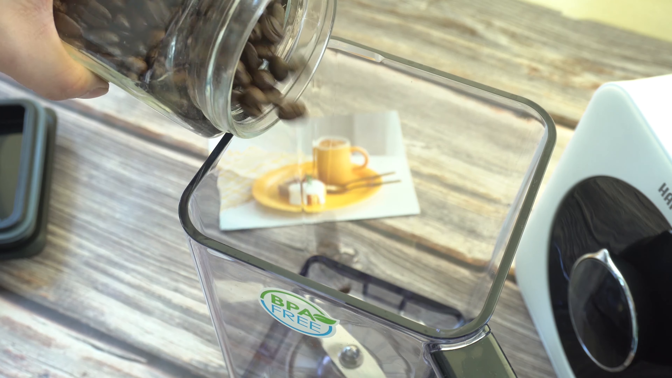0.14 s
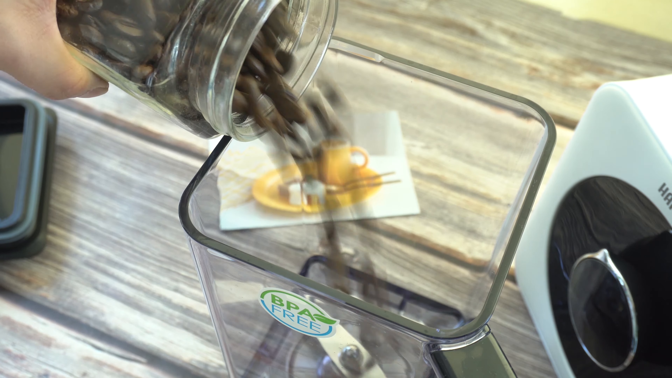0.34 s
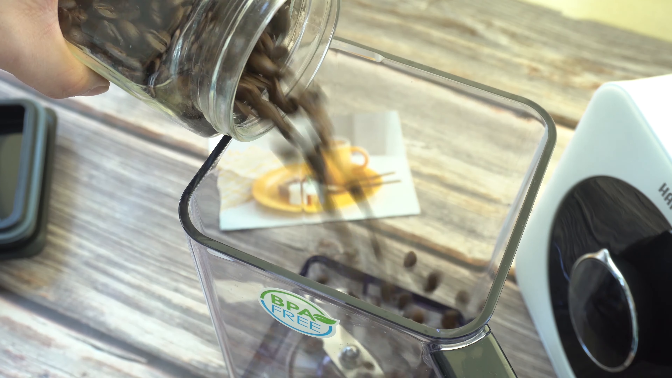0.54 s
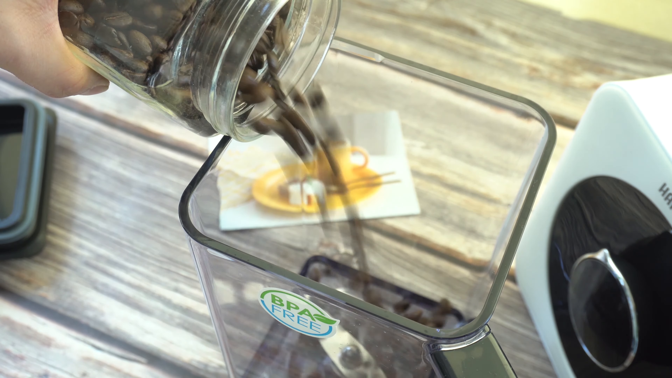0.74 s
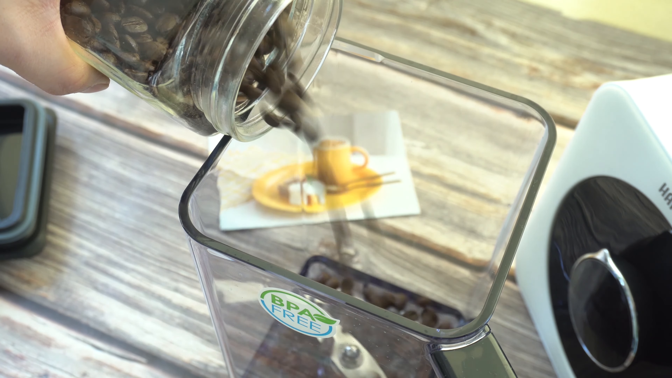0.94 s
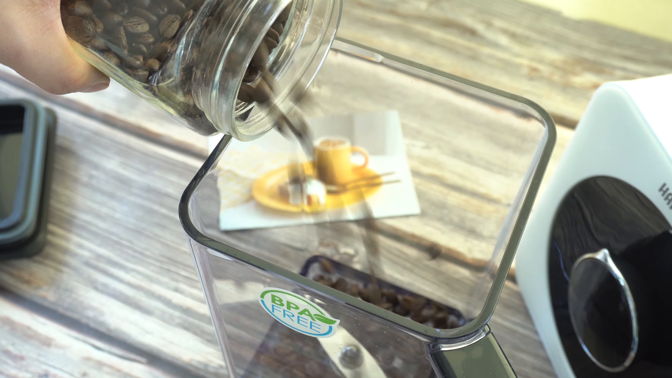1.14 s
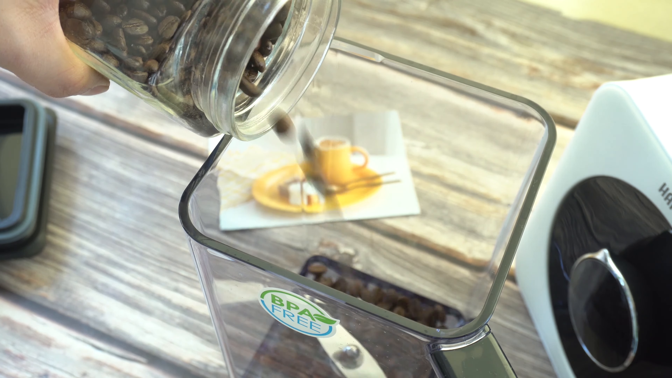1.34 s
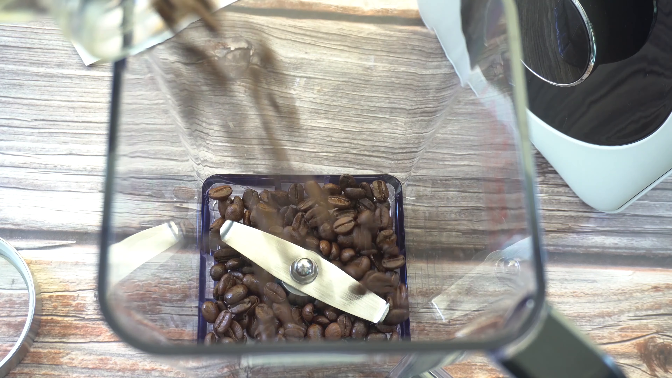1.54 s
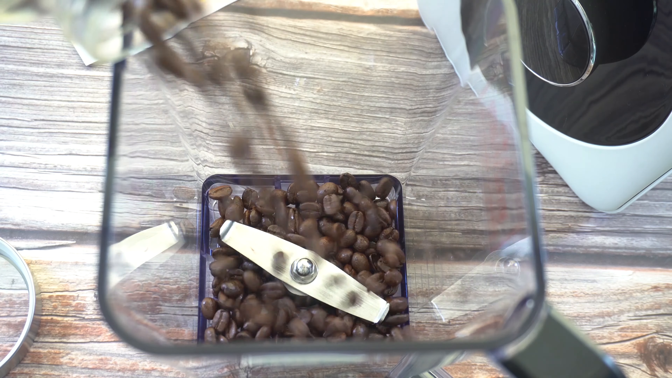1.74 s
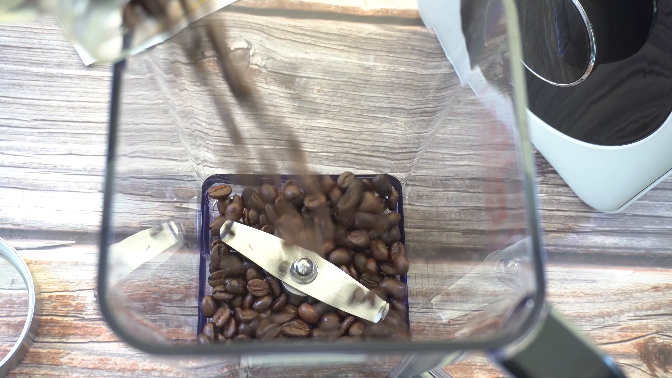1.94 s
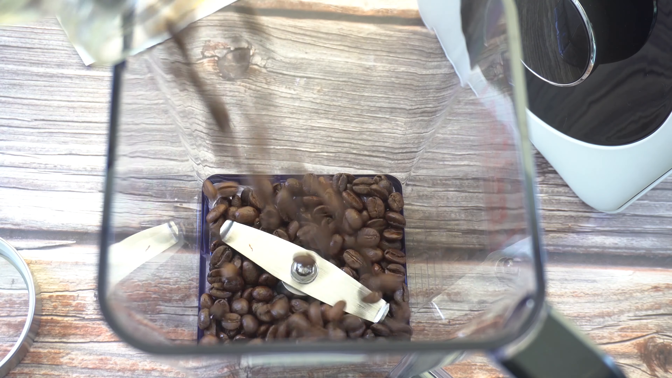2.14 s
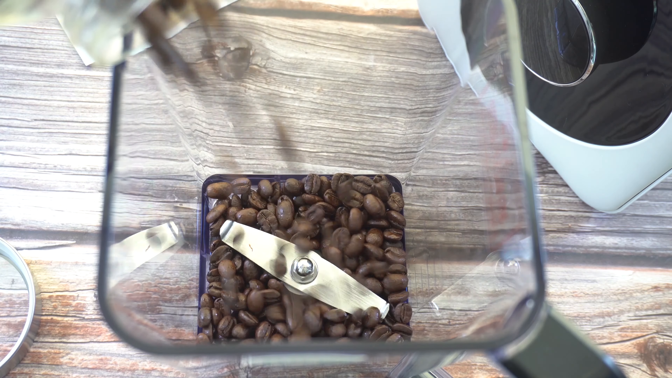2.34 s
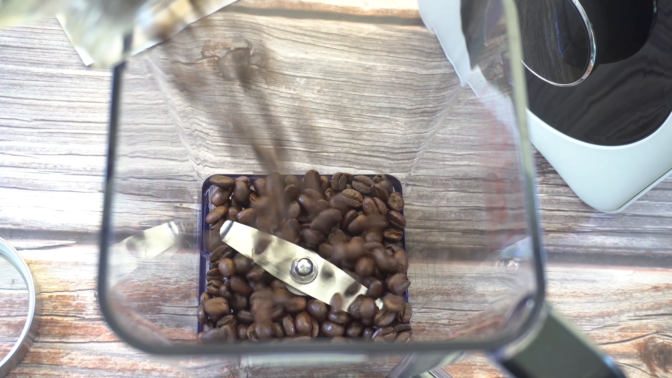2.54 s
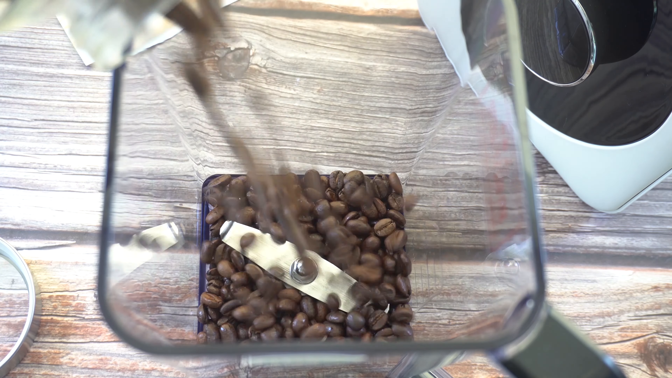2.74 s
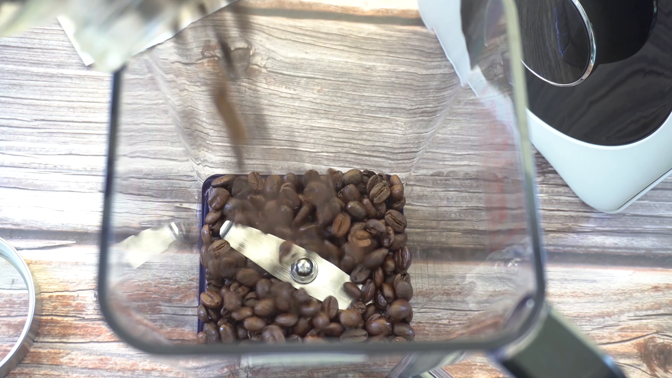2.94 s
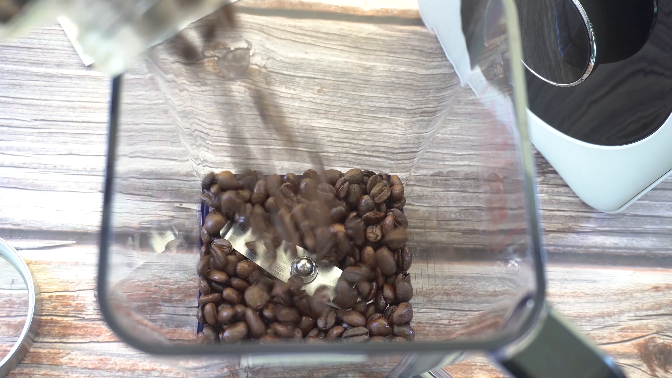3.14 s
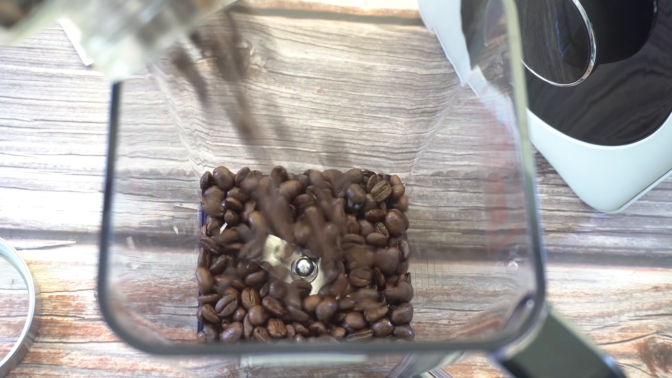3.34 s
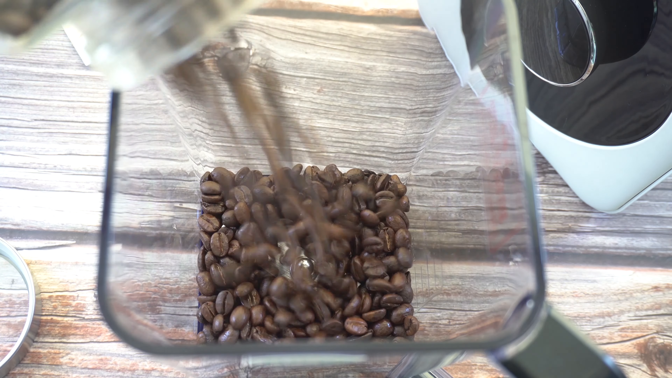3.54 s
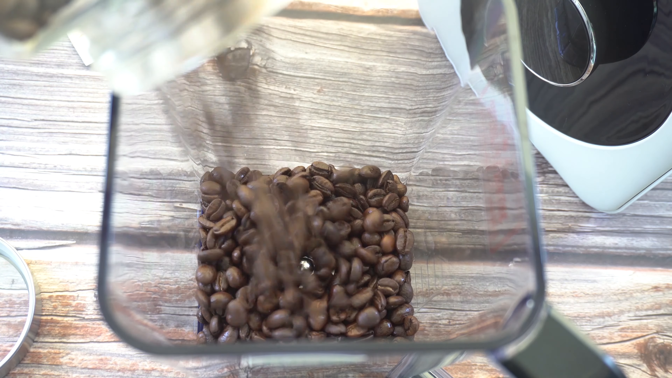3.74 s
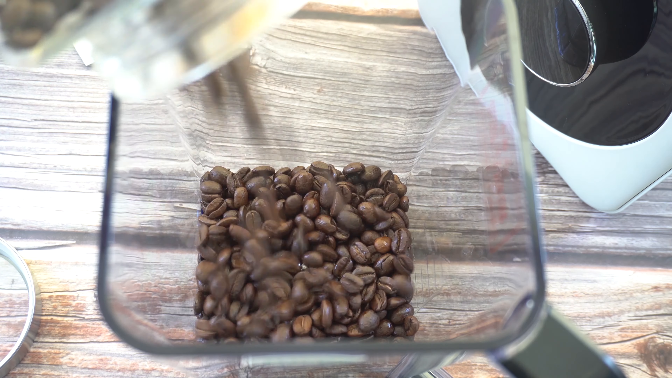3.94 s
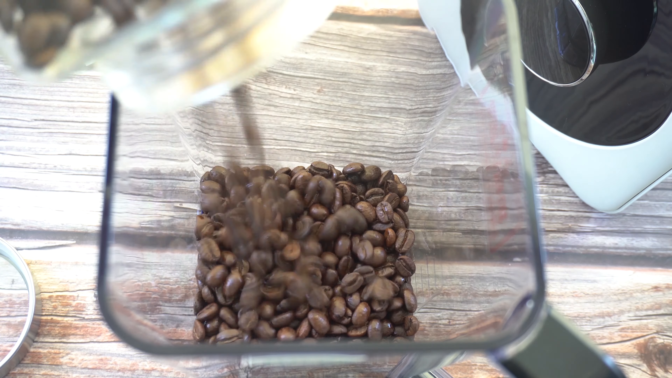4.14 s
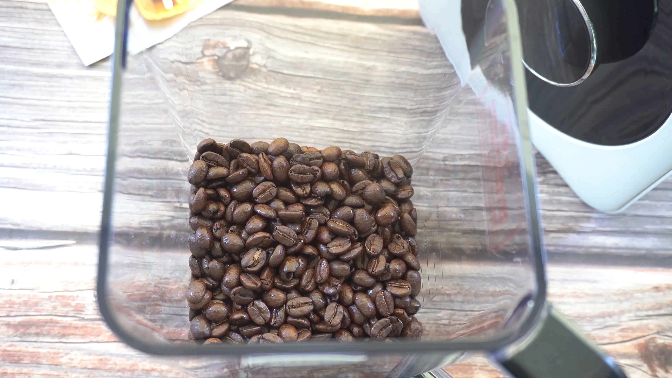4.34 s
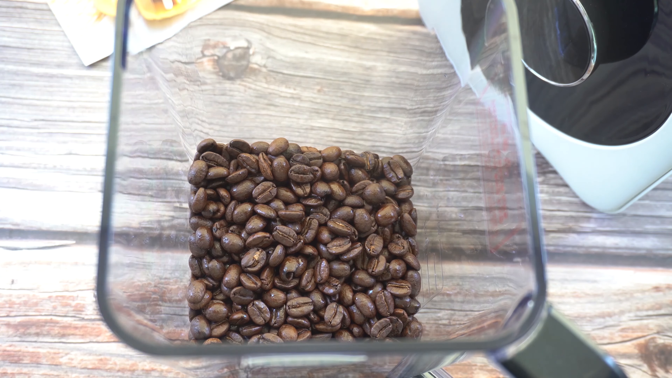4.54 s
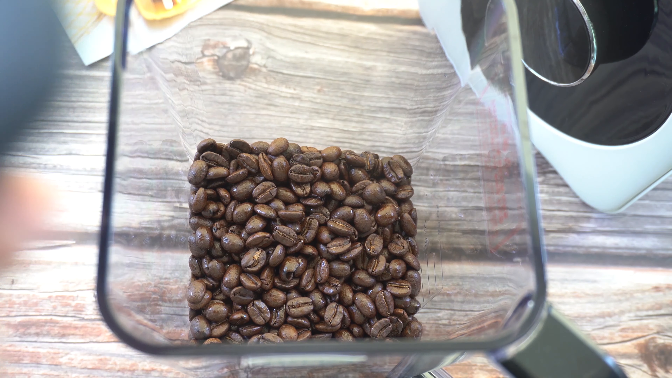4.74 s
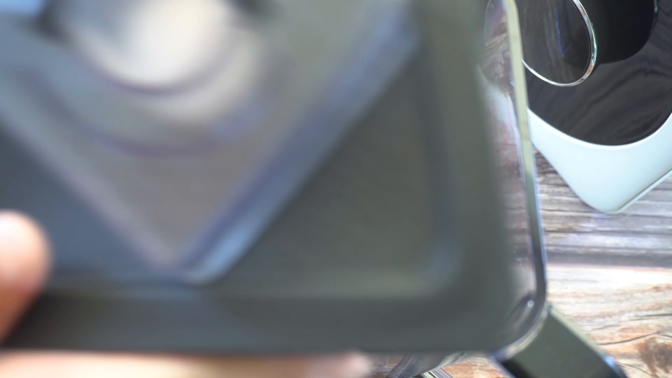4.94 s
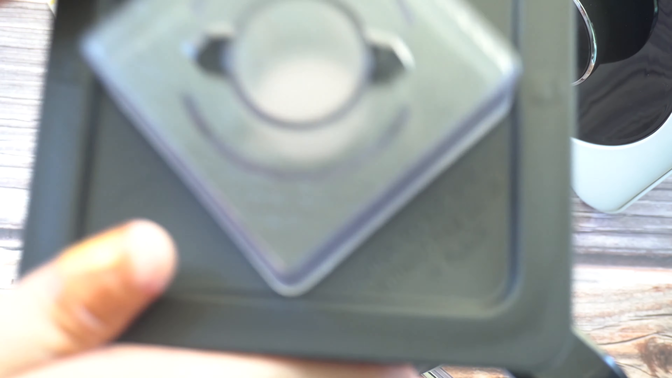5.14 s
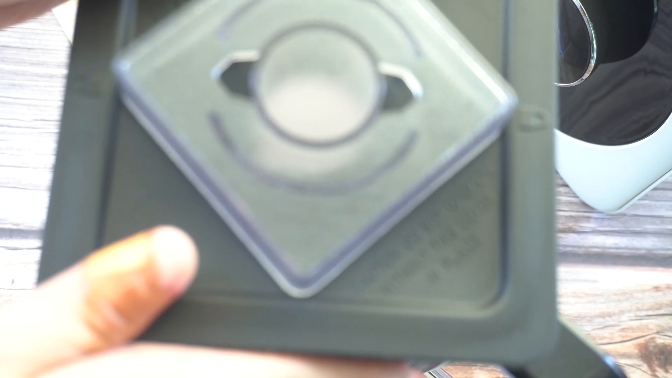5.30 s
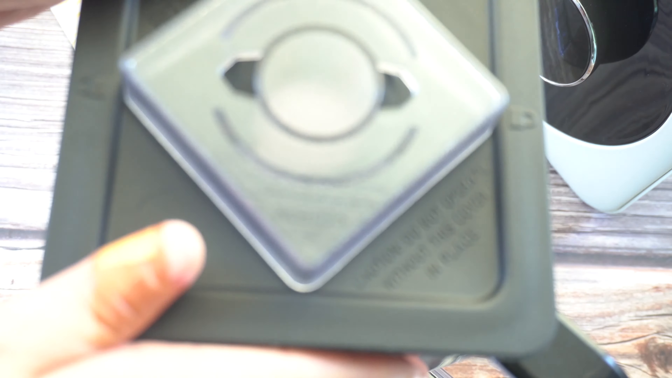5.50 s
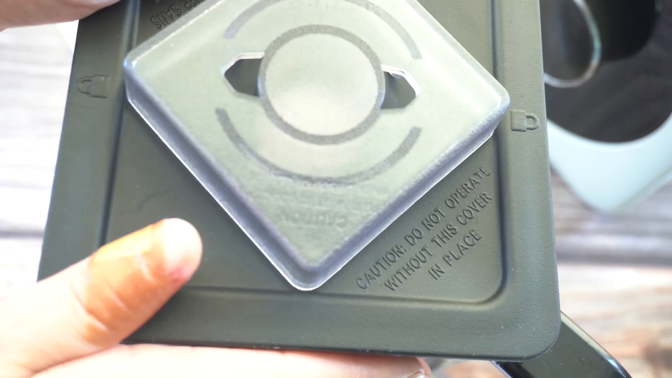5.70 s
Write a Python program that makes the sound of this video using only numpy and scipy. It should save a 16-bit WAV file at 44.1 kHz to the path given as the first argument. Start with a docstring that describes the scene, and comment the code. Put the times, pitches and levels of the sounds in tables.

```python
"""Coffee beans pour from a glass jar into a plastic blender jar, in a quiet room with steady air noise. From
the start beans tick on each other (short chirps and clicks) and drum on the walls (impulses through
resonances); they ring the steel blade (damped sines), fainter as the bed covers it. All pour sounds stop
abruptly at 4.4 s. A hand then lifts and turns the lid: faint knocks (damped modes and noise), a low hum and
rubs (grainy noise)."""
import sys
import numpy as np
from scipy import signal
from scipy.fft import rfft, irfft, next_fast_len
from scipy.io import wavfile
from scipy.ndimage import map_coordinates

SR = 44100
rng = np.random.default_rng(int(sys.argv[2]) if len(sys.argv) > 2 else 0)


def transcribe(u):
    """Save the signal u as a 16-bit wav file named by the first command-line argument.

    u: samples, shape (n,) or (channels, n), limited to [-1, 1]; the rate is SR.
    q: integer samples, one column per channel.
    """
    v = np.clip(np.atleast_2d(u).T, -1, 1)
    q = np.round(v * 32767).astype(np.int16)
    wavfile.write(sys.argv[1], SR, q)


N = 254467

# Room air spectrum. Each row: frequency in Hz, relative level in dB.
AIR_SPECTRUM = [(24, -92.5), (40, -38.5), (201, -28.5), (271, -20), (358, -18), (673, -16), (763, -8.5),
                (981, -14.5), (1110, -23.5), (1290, -20), (3730, -28.5), (4450, -28.5), (4800, -29),
                (14200, -35.5), (16500, -54.5)]
# Likeness of left and right in the room air. Each row: frequency in Hz, correlation.
AIR_LIKENESS = [(60, 0.9), (240, 0.7), (950, 0.39), (15000, 0.2)]
# Low hum of the handled lid. Each row: peak time in seconds, rms level at the peak in dB, rise and fall in seconds.
LID_HUMS = [(5.06, -68.5, 0.027, .03), (5.42, -42.5, 0.025, 0.023), (5.5, -57, 0.017, 0.0093),
            (5.535, -44, 0.0058, 0.0058), (5.565, -52, 0.0086, 0.01), (5.605, -55, 0.009, 0.01),
            (5.642, -64.5, 0.009, .012)]
# Finger strokes on the lid. Each row: peak time in seconds, level in dB, rise and fall in seconds.
RUBS = [(4.49, -38.5, 0.014, 0.0067), (4.6, -49, 0.042, 0.027), (4.81, -43, 0.018, 0.034),
        (5.09, -49.5, 0.045, 0.046), (5.385, -59, .008, 0.0091), (5.47, -54, .008, .008)]
# Spectrum of skin on the lid. Each row: frequency in Hz, relative level in dB.
SKIN_SPECTRUM = [(180, -46), (300, -33), (447, -20), (1100, -9), (1210, -9.5), (2650, -6), (3580, -13.5),
                 (9390, -17), (16000, -27)]
# Hollow knocks of jar and lid. Each row: start in seconds, relative level in dB, level of the bright part
# against it in dB, favoured bright pitch in Hz, share of the hollow modes' free ring time.
KNOCKS = [(0.128, -16.5, -2, 1070, 0.56), (0.346, -21.5, -7, 1060, 0.62), (4.476, -38, 9.5, 2800, 0.25),
          (4.485, -33, 13, 1260, 0.43), (4.809, -71, 10, 1490, .4), (5.089, -32, -4, 1790, 0.35),
          (5.104, -26.5, -10, 1300, 0.37), (5.356, -23.5, -12.5, 900, 0.59),
          (5.377, -30.5, -3.5, 1350, 0.48), (5.463, -47, 5.5, 1650, .5), (5.524, -14.5, -17, 920, 0.56),
          (5.548, -32, -24, 695, 1)]
# Low modes of a knock. Each row: frequency in Hz, level in dB, free t60 in seconds.
HOLLOW_MODES = [(258, -5, .08), (301, -2, .08), (345, -3, .07), (424, 2, .07), (432, -11, .4),
                (490, -4, .07), (570, -13, .06)]
# Bright modes of a knock. Each row: frequency in Hz, level in dB, t60 in seconds.
BRIGHT_MODES = [(816, 3.5, 0.1), (1070, 11.5, 0.027), (1700, 9.5, 0.041), (2100, 9, 0.04),
                (2410, 14, 0.021)]
# Lone clear pings. Each row: start in seconds, relative level in dB, frequency in Hz.
PINGS = [(1.54, -20, 7040), (1.566, -30, 7000), (4.432, -47, 2360), (4.433, -62, 2880), (4.595, -56, 2600)]
# Beans that stand out on the blade. Each row: start in seconds, relative level in dB, landing place 0-3 along it.
BLADE_STRIKES = [(.2464, -18, 0), (.248, -28, 3), (.335, -16, 0), (.336, -24, 3), (.445, -12, 0),
                 (.446, -24, 3), (.555, -14, .2), (.621, -13, .1), (.681, -13, .1), (.741, -15, .1),
                 (.843, -13, .2), (.881, -19, 3), (.895, -15, 1), (.931, -14, .1), (.989, -18, 3),
                 (1.02, -19, .7), (1.115, -18, .3), (1.074, -19, 3), (1.156, -17, 3), (1.265, -18, 3),
                 (1.3234, -12, 0), (1.35, -10, 0), (1.39, -13, .7), (1.398, -16, 3), (1.427, -12, 0),
                 (1.645, -18, 3), (1.646, -13.5, 0), (1.7175, -12, .55), (1.718, -17, 3), (1.7465, -16, .3),
                 (1.778, -19, 2), (1.795, -17, .2), (1.82, -14, .8), (1.85, -17, .5), (1.885, -21, 2),
                 (1.945, -18, .4), (1.9035, -15, 3), (1.909, -14, 1), (1.976, -6, .8), (2.045, -15, .6),
                 (2.064, -17, 3), (2.077, -12, .35), (2.155, -9, .6), (2.192, -12, .55), (2.217, -12.5, 0),
                 (2.263, -14, 0), (2.298, -16, .1), (2.348, -13, 0), (2.429, -19, 0), (2.465, -16, 3),
                 (2.467, -15, .1), (2.601, -26, 2), (2.63, -11, .4), (2.632, -23, 2), (2.677, -23, 2),
                 (2.643, -16, 3), (2.676, -18, .2), (2.755, -17, 3), (2.762, -18, 1.9), (2.8, -21, 2),
                 (2.929, -23, 2), (2.979, -24, 2), (2.783, -17, .1), (2.98, -19, .1), (3.0135, -18, 3),
                 (3.028, -19, 1.2), (3.056, -22, 0), (3.057, -22, 2), (3.103, -22, 0), (3.187, -21, 2),
                 (3.2101, -22, 0), (3.245, -24, 0), (3.315, -26, 0), (3.337, -21, 2), (3.058, -17, 3),
                 (3.123, -19, 3), (3.144, -15, 3), (3.152, -14, 3), (3.78, -29, 2), (3.21, -17, 2),
                 (3.235, -18, 3), (3.237, -18, 2), (3.313, -15, 3), (3.557, -28, 2), (3.631, -28, 2)]
# Blade modes. Each row: frequency in Hz, level in dB, t60 in seconds before stifling.
BLADE_MODES = [(5495, 0.5, .12), (5550, -9, .1), (5157, -2.5, 0.2), (4762, -1, 0.09), (13000, -5.5, .08),
               (12838, -5.5, 0.08)]
# Ring that each blade mode belongs to: 0 main, 1 middle, 2 low, 3 high.
MODE_RING = [0, 0, 1, 2, 3, 3]
# Small hits on the blade, a row per ring. Each row: level at time 0 in dB, drift in dB per second,
# time in seconds when the bed covers it.
SMALL_HITS = [(-24, -3, 2.8), (-36, 2, 2.4), (-44, 4, 3.4), (-34, 0.5, 3.35)]
# Span in which the stream passes beside the blade: start and end in seconds.
MISS_SPAN_S = (1.45, 1.63)
# Resonances of walls and air column. Each row: frequency in Hz, width in Hz, level in dB in the first balance,
# level in dB in the second balance.
JAR_MODES = [(336, 14, -2, -2.5), (444, 31, -4, -9.5), (517, 5.5, -21, -6), (640.3, 8.9, -6, -5),
             (799, 12, -4, -15), (935, 59, -5.5, -6.5), (1220, 66, -10, -15.5), (1300, 79, -6, -4),
             (1423, 143, -9.5, -5), (1626, 45, 0, -0.5), (1900, 79, -2, -1.5), (2024, 69, 1, 2.5),
             (2660, 225, -1, -4), (3140, 46, 2, 1), (4840, 2180, -4, -6.5)]
# Beans that hit the wall hard. Each row: start in seconds, relative level in dB, level of the dull low part
# against it in dB.
THUMPS = [(.398, -22.5, -14), (0.542, -24.5, -14), (.613, -21, 4), (0.652, -22, -3), (.796, -25.5, -12),
          (.851, -19.5, 8.5), (0.954, -23, 0), (1.01, -33.5, -2), (1.036, -19.5, -1), (1.062, -19.5, -17),
          (1.094, -17.5, 11.5), (1.236, -22.5, 6), (1.292, -22.5, 8.5), (1.639, -18, -18),
          (1.694, -24.5, -11), (1.801, -17, -23), (2.006, -18, -18), (2.192, -18, -23), (2.272, -17.5, 2),
          (2.354, -17, -24), (2.453, -20, -22), (2.582, -17.5, -17), (2.603, -17.5, -16), (2.668, -19, -16),
          (2.712, -21.5, -9), (2.736, -17, -24), (2.916, -17, -19), (2.947, -21.5, 15), (3.123, -15.5, 1),
          (3.206, -17.5, -1), (3.242, -17, 2), (3.459, -22, -13), (3.5, -20, -5), (3.557, -20, -15),
          (3.713, -17, -33), (3.956, -20, -11), (4.042, -20.5, -12), (4.073, -17, 5.5)]
# Stream of beans. Each row: time in seconds, ticking level in dB, wall drumming level in dB.
POUR_LEVELS = [(0.0, -37.5, -50), (0.08, -87, -62), (0.18, -48.5, -47), (0.325, -35.5, -59.5),
               (0.42, -28.5, -35), (0.5, -24.5, -46), (0.61, -24.5, -34), (0.97, -23.5, -34.5),
               (1.36, -28.5, -36.5), (1.56, -27.5, -40), (2.19, -25.5, -34), (2.39, -28.5, -36.5),
               (3.0, -29, -32), (3.27, -29.5, -35.5), (3.74, -29.5, -34.5), (4.2, -32.5, -34.5),
               (4.39, -33, -28.5)]
# The stream thins for a moment. Each row: centre in seconds, level change in dB, width in seconds.
LULLS = [(1.376, -8.5, 0.0054), (1.52, -4.5, 0.036), (2.034, -4, 0.011), (2.288, -9, 0.0079),
         (2.401, -5, 0.02), (3.113, -2.5, 0.0032), (3.374, -5, 0.016), (3.42, -4, 0.011),
         (3.922, -7.5, 0.014), (4.133, -2, 0.007), (4.266, -2.5, 0.018)]
# Spectrum of the bean patter. Each row: frequency in Hz, relative level in dB.
BEAN_SPECTRUM = [(300, -55.5), (1000, -63.5), (2000, -3.5), (4000, 2), (7000, 1.5), (10000, -2),
                 (14000, -1.5), (17000, -17)]
# Single beans that stand out. Each row: start in seconds, relative level in dB, tick pitch in Hz.
TICKS = [(0.0427, -28, 9900), (0.0646, -31, 7570), (0.1058, -26, 11500), (0.126, -26, 9800),
         (0.156, -23, 7800), (0.1795, -34, 7310), (0.21, -24, 7720), (0.2301, -8, 11900),
         (0.2477, -1, 7760), (0.3341, -4, 8550), (0.3679, -1.5, 6750), (0.3734, 0, 5750),
         (0.397, 2.5, 8500), (0.417, -6.5, 8180), (0.4465, -0.5, 8060), (0.4694, -16, 8200),
         (0.4738, -9.5, 6100), (0.4963, 1, 11100), (0.8489, -9, 7980), (1.0073, 1, 9770),
         (1.0564, -3, 6700), (1.0745, -5.5, 8750), (1.1015, 1, 11770), (1.155, -5.5, 12100),
         (1.18, -15, 12400), (1.2466, 2.5, 9380), (1.293, -13, 6630), (1.3568, -0.5, 9250),
         (1.4257, -14, 5750), (1.4431, -23, 6260), (1.495, 1, 6530), (1.6045, -8.5, 6530),
         (1.639, -2, 8420), (1.698, -1.5, 6260), (1.7689, -2.5, 6290), (1.819, -1, 7000),
         (1.989, -20, 12300), (2.0393, -22.5, 9010), (2.0642, -14, 11200), (2.108, -14.5, 6820),
         (2.1335, -16.5, 10800), (2.1889, -7.5, 7340), (2.2985, 0.5, 12100), (2.3401, -10.5, 12200),
         (2.368, -6.5, 11900), (2.466, -6, 6200), (2.5481, -4, 7400), (2.753, 0, 11830),
         (2.8599, -15, 11500), (3.0131, -10.5, 11800), (3.121, -7, 12350), (3.1507, -17, 8070),
         (3.1757, -11, 12550), (3.3119, -14, 11500), (3.3827, -16.5, 11900), (3.4271, -5, 9960),
         (3.7753, -6.5, 10600), (3.9379, -8, 10600), (4.026, -9.5, 11840), (4.071, -11, 11300),
         (4.144, -8, 10800), (4.281, -1, 10700), (4.355, -12.5, 11900)]

POUR_END_S, STOP_S = 4.398, 0.0077
AIR_DB = -56.5
LID_HUM_HZ = 139
THUD_DB, THUD_T60_S = 14, .05  # many modes too close to tell apart: short dull noise
PLACE_LOSS_DB = 16  # a ring's loss per unit of distance from the landing place
EDGE_PLACE = 2.5  # beyond it only the high ring sounds
HIGH_FLOOR_DB, HIGH_FLOOR_VARY_DB = -6.5, 4.5  # the high ring also follows any hit
STIFLE_S, STIFLE_VARY, DETUNE = .04, .25, .0015  # detune: beans lying on the steel shift its pitch
SMOTHER_S, SMOTHER_PER_S = 2.3, .9  # from then on the rising bed shortens every ring
SMALL_HITS_START_S, SMALL_HITS_PER_S, SMALL_HIT_SPREAD_DB = .48, 85, 3.5  # rate is per mode
COVER_DB_PER_S = 14  # fading once covered
SECOND_BALANCE_S = 1.48  # from here on the drumming is heard with the second balance of resonances
IMPULSE_DB = 29  # landing and bounce impulses over the table level
DULL_HZ = 900  # the flat side of a bean pushes the wall mainly below this
TICK_CYCLES, LONE_TICK_CYCLES = 1.6, 1.0  # cycles to decay by 1/e
HIGH_TICK_DB, BRIGHTEN_DB_PER_S = -8, 3.5  # a deeper bed ticks higher
TICK_LOW_HZ = 2320  # low cut that keeps the ticks crisp and free of thump
THIN_BELOW_HZ = 245.6  # pour and knocks are heard thin, with steeply cut bass
BASS_CUT_HZ, ROLL_HZ, ROLL_WIDTH_HZ, TOP_HZ = 85, 15950, 40, 16968


def amp(db):
    """Decibels to gain."""
    return 10 ** (np.asarray(db) / 20)


def unit(x):
    """Scales to rms 1."""
    return x / np.sqrt(np.mean(x ** 2) + 1e-20)


def steady(x):
    """Scales to rms 1 over the pour."""
    return x / np.sqrt(np.mean(x[:, :round(POUR_END_S * SR)] ** 2))


def along(points, hz):
    """Interpolates (Hz, value) points on a log frequency axis."""
    f, v = np.transpose(points)
    return np.interp(np.log(hz + 1), np.log(f + 1), v)


def gains(rows):
    """One gain curve per dB column, interpolated in time; the last value holds."""
    s, *columns = np.transpose(rows)
    t = np.arange(N) / SR
    return [amp(np.interp(t, s, db, left=-120, right=db[-1])) for db in columns]


def filtered(x, response):
    """Applies a complex response of frequency."""
    m = next_fast_len(N + SR // 2)
    return irfft(rfft(x, m) * response(np.fft.rfftfreq(m, 1 / SR)), m)[..., :N]


def add(x, s, sound, pan_db):
    """Lays a sound into stereo x at time s."""
    at = round(s * SR)
    x[:, at:at + len(sound)] += (amp([[pan_db], [-pan_db]]) * sound)[:, :N - at]


def swells(rows, power):
    """Sums swells that grow to a peak and die away; power 1 is pointed, 2 is round."""
    t = np.arange(N) / SR
    return sum(amp(db) * np.exp(-np.maximum((s - t) / rise, (t - s) / fall) ** power)
               for s, db, rise, fall in rows)


def rush(spectrum, alike):
    """Stereo noise of rms 1; mixing mid and side sets the likeness of the channels."""
    def mid_side(hz):
        angle = np.arccos(np.clip(along(alike, hz), -1, 1)) / 2
        return amp(along(spectrum, hz)) * [np.cos(angle), np.sin(angle)]

    mid, side = filtered(rng.standard_normal((2, N)), mid_side)
    return unit(np.array([mid + side, mid - side]))


def shower(rate, spread_db, clump_db, pan_db):
    """Impacts at random times as stereo impulses; their scattered strength swells and sinks in clumps."""
    count = int(rate * POUR_END_S)
    when_s = rng.random(count) * POUR_END_S
    size, pan = np.clip(rng.standard_normal((count, 2)), -1.9, 1.9).T
    clump = map_coordinates(rng.standard_normal(300), [when_s * 50])
    gain = amp(spread_db * size + clump_db * clump) * rng.choice([-1, 1], count)
    at = (when_s * SR).astype(int)
    return np.array([np.bincount(at, gain * amp(k * pan_db * pan), N) for k in (1, -1)])


def scatter(x, t60, wet_db):
    """Adds a short noisy tail, alike in both ears only in the bass: echoes between the jar walls."""
    t = np.arange(int(t60 * SR)) / SR
    out = x * 1.
    for part in range(8):  # eight tails take turns in fixed slots of 700 samples
        mid, side = rng.standard_normal((2, len(t))) * amp(-60 * t / t60)
        side = amp(-4.5) * signal.lfilter(*signal.butter(2, 1500, "high", fs=SR), side)
        tail = np.array([mid + side, mid - side]) / np.linalg.norm(mid)
        mine = (np.arange(N) // 700 % 8 == part) * x
        out += amp(wet_db) * signal.oaconvolve(mine, tail, axes=1)[:, :N]
    return out


def ring(modes, t, vary_db):
    """Sums damped sines, each at a new strength and slightly new phase, with a soft onset."""
    total = 0
    for hz, db, t60 in modes:
        level_db = db + vary_db * rng.normal() - 60 * t / t60
        total = total + amp(level_db) * np.sin(2 * np.pi * (hz * t + 0.018 * rng.normal()))
    return total * (1 - np.exp(-t / 0.00015))


def air():
    """Room air: steady coloured noise, more alike between the ears in the bass."""
    return amp(AIR_DB) * rush(AIR_SPECTRUM, AIR_LIKENESS)


def lid():
    """The handled lid hums low and unsteadily while fingers rub over it in grainy strokes."""
    t = np.arange(N) / SR
    waver = 1.3 * map_coordinates(rng.standard_normal(100), [t * 17])  # radians
    hum = np.sqrt(2) * swells(LID_HUMS, power=1.4) * np.sin(2 * np.pi * LID_HUM_HZ * t + waver)
    grain = amp(5 * map_coordinates(rng.standard_normal(N // 40), [np.arange(N) / 42]))
    skin = unit(grain * rush(SKIN_SPECTRUM, [(300, 0.52), (8000, 0.24)]))
    return hum + swells(RUBS, power=0.67) * skin


def knocks():
    """Each knock clicks, thuds, rings the hollow low modes and the bright ones near its pitch; pings ring alone."""
    t = np.arange(SR // 4) / SR
    out = np.zeros((2, N))
    for s, db, bright_db, pitch, free in KNOCKS:
        crack = np.convolve(amp(-60 * t / .02) * rng.standard_normal(len(t)), np.hanning(10), "same")
        thud = np.convolve(amp(-60 * t / THUD_T60_S) * rng.standard_normal(len(t)), np.hanning(20) / 10, "same")
        low = [(hz, level, t60 * free) for hz, level, t60 in HOLLOW_MODES]
        hollow = ring(low, t, vary_db=0.8) * (1 - np.exp(-t / 0.0034))
        near = [(hz, level - 12 * abs(np.log2(hz / pitch)), t60) for hz, level, t60 in BRIGHT_MODES]
        bright = ring(near, t, vary_db=1) + crack + amp(THUD_DB) * thud
        add(out, s, amp(db - 5) * (hollow + amp(bright_db - 10.5) * bright), .4 * rng.normal())
    for s, db, hz in PINGS:
        add(out, s, amp(db) * ring([(hz, 0, .06)], t, vary_db=7), 0)
    return scatter(out, t60=.25, wet_db=-6)


def stifle(s, t):
    """Envelope of a blade ring struck at s: the next beans soon stop it, sooner in a deep bed."""
    lasts_s = STIFLE_S * np.exp(STIFLE_VARY * rng.normal() - SMOTHER_PER_S * max(s - SMOTHER_S, 0))
    return (1 - np.exp(-t / .0018)) * np.exp(-(t / lasts_s) ** 3)


def detuned(hz):
    """Shifts a blade mode a little at random."""
    return hz * (1 + DETUNE * rng.normal())


def blade():
    """Where a bean lands decides which of the blade's rings sound; small hits fade once the bed covers it."""
    t = np.arange(SR // 10) / SR
    steel = np.zeros((2, N))
    for s, db, place in BLADE_STRIKES:
        ring_db = [-PLACE_LOSS_DB * abs(place - k) - 60 * (place > EDGE_PLACE) for k in range(3)]
        high_floor_db = HIGH_FLOOR_DB + HIGH_FLOOR_VARY_DB * rng.normal()
        ring_db.append(max(-PLACE_LOSS_DB * abs(place - 3), high_floor_db))
        modes = [(detuned(hz), level + ring_db[k], t60) for (hz, level, t60), k in zip(BLADE_MODES, MODE_RING)]
        add(steel, s, amp(db) * ring(modes, t, vary_db=1.5) * stifle(s, t), 1.5 * rng.normal())
    miss_start, miss_end = MISS_SPAN_S
    for (hz, level, t60), k in zip(BLADE_MODES, MODE_RING):
        db, drift, covered = SMALL_HITS[k]
        for s in rng.uniform(SMALL_HITS_START_S, POUR_END_S, round(SMALL_HITS_PER_S * POUR_END_S)):
            if miss_start < s < miss_end:
                continue
            db_now = db + drift * min(s, covered) - COVER_DB_PER_S * max(s - covered, 0)
            hit = ring([(detuned(hz), level + db_now, t60)], t, vary_db=SMALL_HIT_SPREAD_DB)
            add(steel, s, hit * stifle(s, t), 2 * rng.normal())
    return steel


def jar_response(hz):
    """Resonances of walls and air column with alternating sign, in both balances."""
    balances = []
    for column in (2, 3):
        total = 0
        for k, row in enumerate(JAR_MODES):
            damping = 1j * hz * row[1]
            total = total + (-1) ** k * amp(row[column]) * damping / (row[0] ** 2 - hz * hz + damping)
        balances.append([total])
    return np.array(balances)


def through_jar(x):
    """Impacts through the jar resonances, in the first balance, then in the second."""
    first, second = filtered(x, jar_response)
    return np.where(np.arange(N) < SECOND_BALANCE_S * SR, first, second)


def walls(flow):
    """Beans drum on the plastic; walls and air column answer at their resonances."""
    drum = flow * steady(through_jar(shower(rate=500, spread_db=4.0, clump_db=2.0, pan_db=-0.35)))
    blows, dull = np.zeros((2, 2, N))
    for s, db, dull_db in THUMPS:  # a bean lands and bounces once
        add(blows, s, amp([db + IMPULSE_DB]), 0.73 * rng.normal())
        add(dull, s, amp([db + dull_db + IMPULSE_DB]), 0)
        add(blows, s + rng.uniform(0.001992, .006), amp([db + IMPULSE_DB]), 0.31 * rng.normal())
    blows = blows + filtered(dull, lambda hz: 1 / (1 + 1j * hz / DULL_HZ) ** 2)
    return scatter(drum + through_jar(blows), t60=0.19, wet_db=-2.5)


def chip(hz, cycles):
    """One hard tick: a sine that dies within a few cycles."""
    t = np.arange(40) / SR
    return np.sin(2 * np.pi * hz * t) * np.exp(-t * hz / cycles)


def beans(flow):
    """Bean on bean: a dense patter of hard ticks, with the ones that stand out placed singly."""
    wide = filtered(shower(rate=900, spread_db=2, clump_db=1.0, pan_db=2.5),
                    lambda hz: amp(along(BEAN_SPECTRUM, hz)))
    high = np.zeros((2, N))
    for hz in (10800, 13300, 15200):
        hits = shower(rate=280, spread_db=3.5, clump_db=1.5, pan_db=3.5)
        high += signal.oaconvolve(hits, chip(hz, TICK_CYCLES)[None], axes=1)[:, :N]
    high_gain = amp(HIGH_TICK_DB + BRIGHTEN_DB_PER_S * np.arange(N) / SR)
    patter = flow * (steady(wide) + high_gain * steady(high))
    for s, db, hz in TICKS:
        add(patter, s, amp(db) * unit(chip(hz, LONE_TICK_CYCLES)) / 5, 1.5 * rng.normal())
    patter = filtered(patter, lambda hz: (1j * hz / (TICK_LOW_HZ + 1j * hz)) ** 2)
    near = scatter(patter, t60=0.004, wet_db=-5)
    return scatter(near, t60=.06, wet_db=-8.5)


def thin_bass(hz):
    """Steep bass cut that makes pour and knocks sound thin."""
    return (1j * hz / (THIN_BELOW_HZ + 1j * hz)) ** 2 / np.sqrt(1 + (THIN_BELOW_HZ / (hz + 1)) ** 8)


def scene():
    """Room air, lid, knocks and pour."""
    t = np.arange(N) / SR
    lull_gain = amp(sum(db * np.exp(-((t - s) / width) ** 2) for s, db, width in LULLS))
    tick_flow, drum_flow = lull_gain * gains(POUR_LEVELS)
    stop = np.clip((POUR_END_S - t) / STOP_S, 0, 1)
    ticking = beans(tick_flow) * amp([[.7], [-.7]])
    drumming = walls(drum_flow) * amp([[-.3], [.3]])
    pour = stop * (ticking + drumming + blade())
    return air() + lid() + filtered(pour + knocks(), thin_bass)


def record(dry):
    """The input stage caps hard peaks and cuts deep bass; treble drops in a step, then ends at the band limit."""
    soft = dry / (1 + np.abs(dry / .75) ** 8) ** (1 / 8)

    def band(hz):
        bass_cut = 1j * hz / (BASS_CUT_HZ + 1j * hz)
        treble_step = amp(-18 * (1 + np.tanh((hz - ROLL_HZ) / ROLL_WIDTH_HZ)))
        return bass_cut * treble_step * (hz < TOP_HZ)

    return filtered(soft, band)


dry = scene()
out = record(dry)
transcribe(out)
```